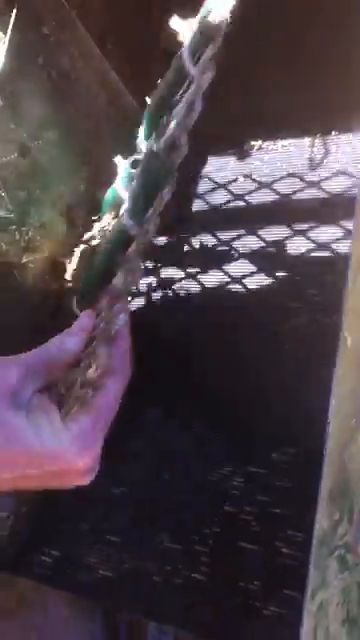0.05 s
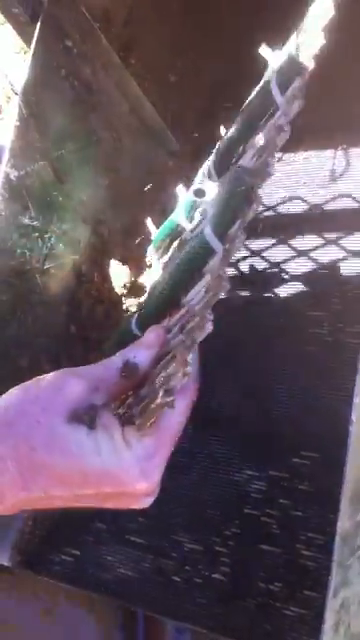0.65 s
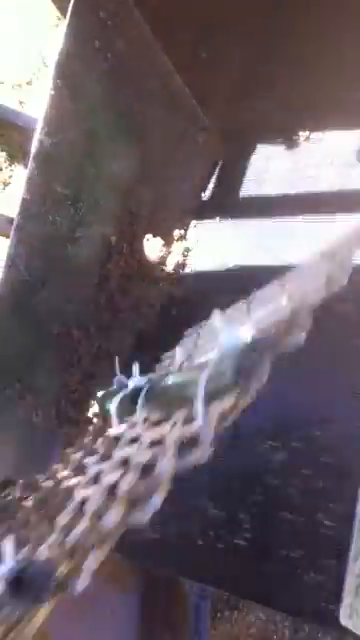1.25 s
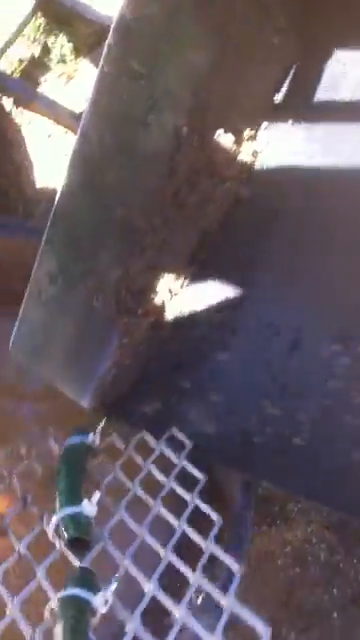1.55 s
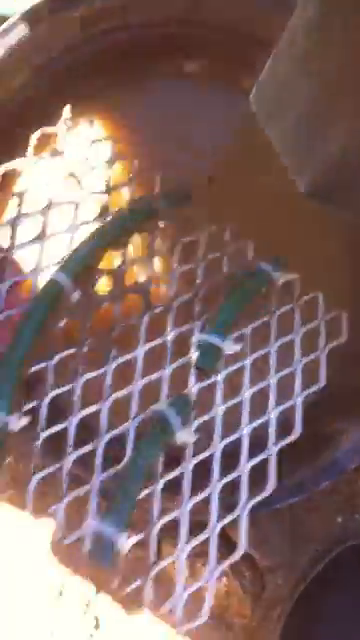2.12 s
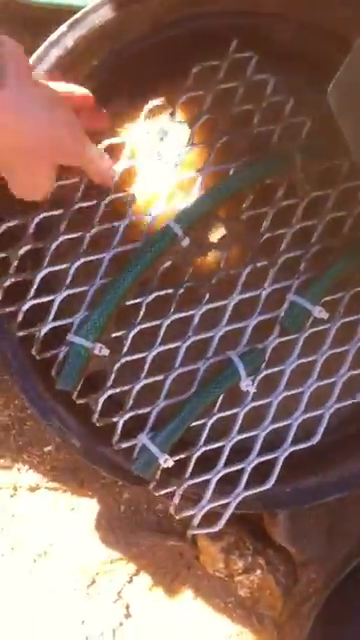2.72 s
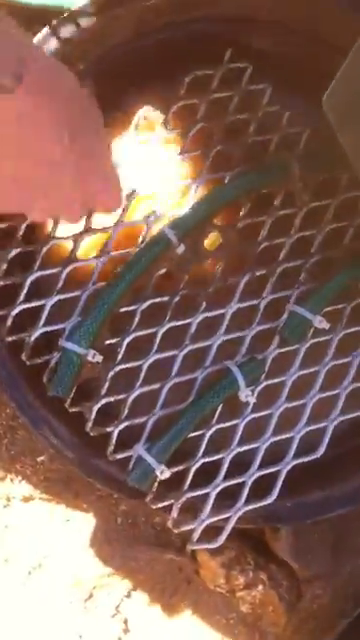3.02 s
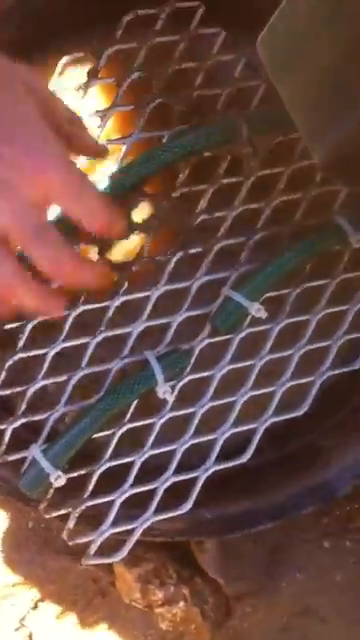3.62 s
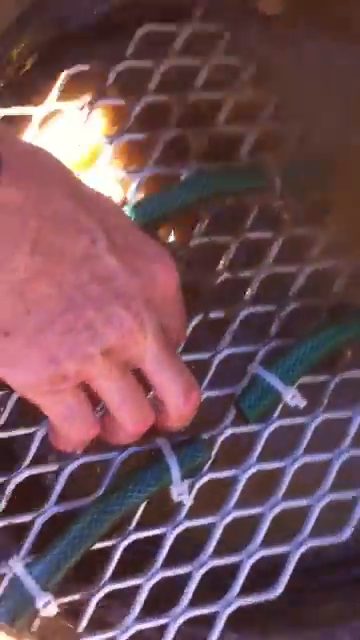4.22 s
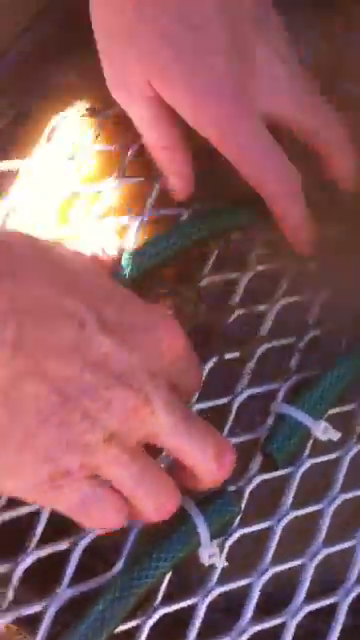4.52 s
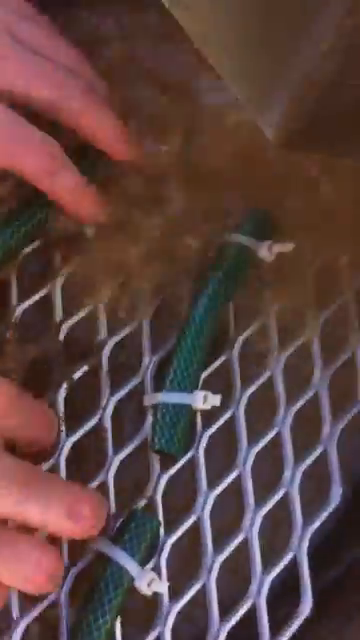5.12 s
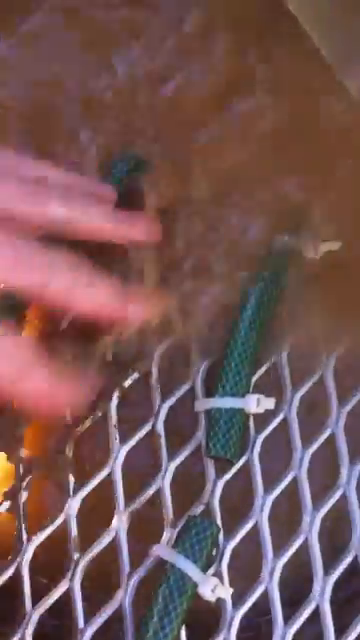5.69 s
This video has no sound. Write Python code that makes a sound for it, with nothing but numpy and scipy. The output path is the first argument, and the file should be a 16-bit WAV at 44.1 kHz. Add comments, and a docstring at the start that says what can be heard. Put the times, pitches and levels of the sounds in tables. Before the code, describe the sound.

Close by in a quiet outdoor spot, two solid knocks of steel mesh on a board shake loose a patter of grit and drips. A much softer knock follows. The mesh then lands in a plastic tub of water, its wires rattling and the tub ringing dully. It scrapes and clicks in short pushes while faint bubbles rise, then gives a last hard clatter and a sharp wire snap.

```python
"""In quiet outdoor air, a wet steel mesh with hose runners is knocked twice against a board.
The board thuds and rings; shed grit and drips tick on the ground, and a faint third knock follows.
The mesh clips the rim of a plastic tub of water, drops in and clatters, ringing wires and tub.
Short scraping strokes push it under, wires ping, and trapped air rises as small bubbles.
One last hard clatter comes near the end."""
import sys
import numpy as np
from scipy import signal
from scipy.fft import rfft, irfft, next_fast_len
from scipy.io import wavfile

SR = 44100
rng = np.random.default_rng(int(sys.argv[2]) if len(sys.argv) > 2 else 0)


def transcribe(u):
    """Save the signal u as a 16-bit wav file named by the first command-line argument.

    u: samples, shape (n,) or (channels, n), limited to [-1, 1]; the rate is SR.
    q: integer samples, one column per channel.
    """
    v = np.clip(np.atleast_2d(u).T, -1, 1)
    q = np.round(v * 32767).astype(np.int16)
    wavfile.write(sys.argv[1], SR, q)


N = 262394
RING_SIZE = 24576
RING_T = np.arange(RING_SIZE) / SR

# Colours of the outdoor air and a far hum. Each row: frequency in Hz, relative level in dB.
AIR_COLOUR = [(15, -63), (25, -32), (117, -8.5), (180, -7.5), (317, -11), (363, -13), (427, -8.5),
              (545, -14.5), (863, -12.5), (962, -14), (1790, -20.5), (5570, -30.5), (6740, -28),
              (7920, -30.5), (16000, -23.5)]
HUM_COLOUR = [(100, -35.5), (114, -8.5), (118, 16), (135, -29.5)]
# The air's fader. Each row: time in seconds, level in dB.
AIR_LEVEL = [(0, -59), (0.2, -62), (2.299, -64), (5.95, -59.5)]

# Wire snaps and grit. Each row: start in seconds, relative level in dB, brightness in dB per octave.
TICKS = [(0.387, -35, 4), (0.4206, -33.5, 6.5), (0.458, -47, 6), (0.597, -45, 4), (0.675, -32, -1),
         (0.7193, -40.5, 5), (1.1558, -47.5, 5.5), (1.1743, -44, -0.5), (1.8577, -34, 1.5),
         (1.9125, -43.5, 16), (2.1274, -44.5, 15), (2.5136, -22.5, -5), (2.771, -28, -1.5),
         (2.843, -33, -1.5), (2.926, -35, 9), (3.092, -33, -3), (3.264, -33, 1), (3.6885, -34, -4.5),
         (4.224, -20.5, 1.5), (5.3846, -20, -7.5), (5.5465, -28, -1), (5.696, -30.5, 6), (5.8087, -26.5, 8)]
# Colour of a gritty tick. Each row: frequency in Hz, relative level in dB.
TICK_COLOUR = [(300, -5.5), (900, -4.5), (2000, -1.5), (4000, -2), (8000, -2), (11000, -3.5),
               (16000, -12.5)]
# Single wire pings. Each row: start in seconds, level in dB, pitch in Hz, t60 in seconds.
PINGS = [(2.001, -40.5, 3030, 0.01), (2.093, -38, 4720, 0.0053), (2.848, -36.5, 3270, 0.029),
         (4.643, -33, 2770, 0.023), (5.651, -47.5, 1150, .04), (5.7, -39, 2970, 0.054),
         (5.812, -8.5, 3560, 0.0036), (5.891, -32.5, 2070, 0.02)]
# The wire that clips the rim. Each row: frequency in Hz, relative level in dB, t60 in seconds.
RIM_WIRE_MODES = [(2300, -2, 0.26), (2350, 3.5, 0.11), (2430, 0, 0.072), (3030, -4, 0.062),
                  (3360, 4.5, 0.031)]

# Knocks on the board. Each row: start in seconds, then relative dB of ring, thud, grit and wire crack.
KNOCKS = [(0.187, 4.5, -8.5, -17, -17), (0.633, 1, -13.5, -21, -11), (1.71, 0.5, -39, -62, -55)]
# Board modes; each knock lands on another spot.
# Each row: frequency in Hz, t60 in seconds, then relative dB in the first, second and third knock.
BOARD_MODES = [(215, .62, -29, -37, -60), (460, .55, -35, -34, -64), (815, .16, -24, -31, -62),
               (178, .25, -35, -33, -48), (208, .08, -17, -24, -46), (254, .2, -34, -28, -54),
               (276, .18, -29, -42, -38), (334, .2, -33, -34, -52), (386, .09, -14, -16, -42),
               (432, .055, -9, -16, -56), (457, .12, -24, -12, -54), (486, .08, -14, -30, -42),
               (632, .08, -27, -23, -58), (705, .07, -32, -38, -48), (830, .05, -21, -28, -60),
               (920, .05, -18, -28, -62), (1040, .05, -21, -19, -70), (1272, .1, -29, -42, -80),
               (1420, .06, -28, -30, -80), (1660, .05, -27, -23, -80), (1875, .05, -24, -23, -80)]
# Dull bumps of the hose runners and the shaken board. Each row: start in seconds, relative level in dB.
BUMPS = [(0.244, -27), (0.718, -38), (0.867, -50.5), (1.715, -41.5), (1.773, -57), (1.969, -48.5),
         (4.02, -46), (4.385, -41.5), (5.251, -46), (5.832, -47)]
# Colours of a bump and of a knock's thud. Each row: frequency in Hz, relative level in dB.
BUMP_COLOUR = [(140, -15), (190, 5.5), (290, 2.5), (370, 5.5), (480, -3), (700, -12.5), (1000, -14)]
THUD_COLOUR = [(80, -23.5), (130, -7.5), (200, 1), (310, -9.5), (400, -3.5), (480, -2.5), (650, -3.5),
               (1000, -10.5), (1900, -15.5), (3300, -26.5), (4700, -26), (8000, -20.5), (16000, -32.5)]
# The thud's decay. Each row: frequency in Hz, t60 in seconds.
THUD_DECAY = [(200, 0.55), (500, 0.11), (1000, 0.14), (2500, 0.072), (9000, 0.046)]

# Modes of the mesh and of the tub's floor and wall.
# Each row: frequency in Hz, relative level in dB, t60 in seconds before the water caps it.
MESH_MODES = [(1340, -12, .15), (1460, -9, .18), (1789, -4, .18), (1846, -4, .15), (1935, -3, .15),
              (2060, -1, .15), (2120, 0, .17), (2349, -1, .2), (2436, -2, .2), (2675, -2, .2),
              (2965, -4, .18), (3030, -3, .18), (3233, -2, .16), (3533, -3, .22), (3754, -6, .2)]
FLOOR_MODES = [(189.3, -2.5, 0.18), (212.6, 6.5, 0.06), (274, -7.5, 0.28), (288, -22.5, 0.047),
               (365, -25, 0.23)]
WALL_MODES = [(361, -4, 0.038), (476.5, -4.5, .12), (535.9, -3, 0.18), (585.9, -1, 0.25),
              (629.6, -7.5, 0.25), (649.5, -3.5, 0.26), (732, -3, 0.094), (806.5, -3.5, 0.069),
              (909, -2, 0.071), (1031, -8, 0.071), (1130, -11, 0.1), (1390, -14, 0.09)]
# Colours of mesh, thin wires and wire scratching plastic. Each row: frequency in Hz, relative dB.
MESH_COLOUR = [(800, -62), (1100, -34), (1350, -5.5), (1650, -7.5), (2060, 4), (2450, -3), (2800, -2.5),
               (3500, -16.5)]
THIN_WIRE_COLOUR = [(1900, -4.5), (2500, -10), (2900, -2.5), (3300, 1.5), (3900, -5), (4700, -8),
                    (6500, -24.5)]
SCRATCH_COLOUR = [(2500, -68), (4000, -6), (5500, -2.5), (7500, -5), (10000, -8), (12000, -13),
                  (15500, -13.5)]
# How strongly the five parts answer: mesh, floor, wall, scratch, thin wire.
# Each row: gain for a blow in dB, gain for a slide in dB.
COUPLING = [(19.2, -1), (20.4, -7), (19.9, -0.5), (18.3, 0.5), (19.24, 1)]
# The mesh creeps under its own weight. Each row: time in seconds, relative level in dB.
CREEP = [(2.56, -48.5), (2.73, -55.5), (2.96, -53), (3.07, -55.5), (3.13, -69.5), (3.26, -69), (3.34, -55),
         (3.5, -68), (3.7, -59.5), (3.83, -62), (5.63, -68.5), (5.95, -75)]
# Hands push the mesh under. Each row: start and length in seconds, relative final level in dB,
# swell on the way in dB, then tub and scratch offsets in dB.
STROKES = [(3.663, 0.045, -52, -7, -11, 1), (3.851, 0.14, -45, 2.5, 6, 6.5),
           (4.014, 0.058, -36.5, -6.5, -2, -9), (4.087, 0.049, -40, 0, -4.5, -5.5),
           (4.129, 0.065, -31, 5.5, -11, -8.5), (4.262, 0.043, -42, -3, 0.5, -22),
           (4.305, 0.09, -29, 9, -4.5, -14), (4.471, 0.047, -39, -2.5, -1, -5),
           (4.595, .025, -58.5, 1, 1, 4), (4.685, 0.09, -42.5, -4, -4, -3.5),
           (4.828, 0.042, -41, -2.5, -9, -12), (4.886, 0.085, -35.5, 21, -6, -10),
           (5.036, 0.082, -30, 5.5, -0.5, -9), (5.15, 0.044, -38.5, -0.5, 3, -6.5),
           (5.215, 0.044, -57.5, 5, 13, -6), (5.445, 0.077, -54, -10.5, 3.5, -4),
           (5.723, 0.064, -37.5, -1, 0, -7), (5.837, 0.053, -56, 4, 8.5, 8.5)]
# The mesh hits the tub. Each row: start in seconds, strength in dB,
# then tub, scratch and thin wire offsets in dB, and the clatter's t60 in seconds.
HITS = [(2.3483, -14, 3.5, -8, -1.5, 0.11), (2.3623, -23.5, 8.5, -14, 5, .12),
        (2.3875, -22.5, 4, -25, -15, 0.2), (2.4582, -15.5, -7, 0, -5.5, 0.05),
        (2.5251, -21, 10, -11, -11, 0.1), (2.544, -20.5, 0, -4.5, -2, 0.14),
        (2.648, -29, 0.5, -13.5, -9, 0.046), (2.7868, -24.5, -7.5, -6.5, -8, 0.081),
        (2.882, -29.5, -4.5, -16, -7.5, .035), (2.9433, -24.5, -9.5, -10, -6.5, 0.039),
        (2.99, -22.5, -12.5, -24, -4, 0.17), (3.2787, -29.5, 3.5, 0, -6, .093),
        (3.304, -30.5, -3.5, -28, -13, 0.13), (3.408, -37.5, -3, -29, -32, .022),
        (3.56, -37, -6.5, -30, -8.5, 0.047), (3.8332, -30, -5, -27, -7.5, 0.068),
        (3.8593, -39, 6.5, 14.5, -2, 0.15), (3.89, -24.5, -6.5, -15, -5, 0.0089),
        (3.9293, -42, 0, 13, 2, 0.067), (3.961, -21.5, -6, -4, 1, 0.065),
        (4.261, -20, -6.5, -11, -3, 0.037), (4.384, -22.5, -9, -7, 0, 0.11),
        (4.464, -22, -8.5, -18, -13, 0.047), (5.0566, -19, -10, -30, -11, 0.035),
        (5.2864, -31, -21, -26, -2.5, 0.046), (5.394, -9, -9.5, -5.5, -6, 0.12)]


def from_db(db):
    """Decibels to gain."""
    return 10 ** (np.asarray(db) / 20)


def unit(x):
    """Scale to an energy of one."""
    return x / np.sqrt(np.sum(x ** 2) + 1e-20)


def fade(t60):
    """Exponential decay, 60 dB down after t60 seconds."""
    return np.exp(-np.log(1000) * RING_T / max(t60, 1e-3))


def add(out, start_s, sound):
    """Mix a sound in at a time."""
    start = int(round(start_s * SR))
    out[start:start + len(sound)] += sound[:N - start]


def low_cut(x, hz):
    """Roll off the lows: small bodies radiate little bass."""
    return signal.sosfilt(signal.butter(4, hz, "high", fs=SR, output="sos"), x)


def log_bins(size):
    """Log frequency of each bin of a spectrum."""
    return np.log(np.fft.rfftfreq(size, 1 / SR) + 1)


def coloured(x, colour):
    """EQ a sound with a curve that falls away beyond its ends."""
    hz, db = np.transpose(colour)
    size = next_fast_len(len(x), True)
    corners = np.log([hz[0] / 2, *hz, hz[-1] * 2])
    eq_db = np.interp(log_bins(size), corners, [db[0] - 10.5, *db, db[-1] - 23])
    return irfft(rfft(x, size) * from_db(eq_db), size)[:len(x)]


def noise(colour, size):
    """Noise of a given colour; rms 1."""
    return unit(coloured(rng.standard_normal(size), colour)) * np.sqrt(size)


def grains(per_s, spread_db, size):
    """Random tiny contacts of uneven strength; rms 1."""
    strength = from_db(spread_db * np.minimum(rng.exponential(1, size), 4))
    polarity = rng.choice([-1, 1], size)
    touches = rng.random(size) < per_s / SR
    return unit(strength * polarity * touches) * np.sqrt(size)


def mode(hz, t60):
    """One decaying sine."""
    return np.sin(2 * np.pi * hz * RING_T) * fade(t60)


def ringing(colour, t60, tail_db, tail_t60):
    """Many crowded modes: a quick decay, then a weaker slow one."""
    return unit(noise(colour, RING_SIZE) * (fade(t60) + from_db(tail_db) * fade(tail_t60)))


def wet_body(modes, longest_t60=0.24):
    """A set of modes, neighbours swinging in opposite senses; water keeps every ring short."""
    return unit(sum((-1) ** k * from_db(db) * mode(hz, min(t60, longest_t60))
                    for k, (hz, db, t60) in enumerate(modes)))


def through(drive, response):
    """Let a body ring to a drive."""
    return signal.fftconvolve(drive, response)[:len(drive)]


def outdoor_air(hum_db=-71.5):
    """The bed: soft air and a faint far hum."""
    air_db = np.interp(np.arange(N) / SR, *np.transpose(AIR_LEVEL))
    return from_db(air_db) * noise(AIR_COLOUR, N) + from_db(hum_db) * noise(HUM_COLOUR, N)


def bubbles(push, count=90, ring_cycles=45, rise=6.0):
    """The sinking mesh traps air: bubbles ring and rise in pitch, louder when it is pushed harder."""
    first_s, out = STROKES[0][0], np.zeros(N)
    for when, pitch, size in rng.random((count, 3)):
        start = first_s + when * ((N - 1) / SR - first_s)
        hz = 750 * 9 ** pitch
        blip = np.sin(2 * np.pi * hz * RING_T * (1 + rise * RING_T)) * fade(ring_cycles / hz)
        add(out, start, push[int(start * SR)] * from_db(8 * size - 1) * blip)
    return out


def spatter(t60, tilt_db):
    """A gritty snap with a faint tail, tilted by tilt_db per octave."""
    colour = [(hz, db + tilt_db * np.log2(hz)) for hz, db in TICK_COLOUR]
    grit = coloured(grains(per_s=8300, spread_db=2.5, size=RING_SIZE), colour)
    attack = 1 - fade(t60 / 4)
    decay = fade(t60) + from_db(-27.5) * fade(0.17)
    return from_db(15) * unit(grit * attack * decay)


def snaps_and_drips(drips_per_knock=6, tick_t60=0.026):
    """Each knock brings a wire crack, a spray and drips; stray snaps and grit tick in between."""
    out = np.zeros(N)
    for start, *_, grit_db, crack_db in KNOCKS:
        # the wire cracks just before the board swings, then springs back and flings a bright spray
        add(out, start - 0.0023, from_db(crack_db) * spatter(t60=0.038, tilt_db=-1))
        add(out, start + 0.029, from_db(grit_db - 7.5) * spatter(t60=0.04, tilt_db=7.5))
        for wait_s in 0.089 + 0.28 * rng.random(drips_per_knock):
            add(out, start + wait_s, from_db(-47 - 9 * wait_s) * spatter(tick_t60, tilt_db=5.5))
    for start, db, tilt_db in TICKS:
        add(out, start, from_db(db) * spatter(tick_t60, tilt_db))
    return low_cut(out, hz=250)


def wire_pings(rim_tap_s=1.8583, rim_tap_db=-40.5, echo_db=-6):
    """One wire clips the tub's rim and others ping, echoing between tub and board."""
    pings = np.zeros(N)
    rim_tap = [(rim_tap_s, rim_tap_db + db, hz, t60) for hz, db, t60 in RIM_WIRE_MODES]
    for start, db, hz, t60 in [*rim_tap, *PINGS]:
        # a wire buzzes against its neighbours, which roughens the ring
        buzz = 1 + 0.6 * noise([(30, 0), (200, -3), (500, -20)], RING_SIZE)
        add(pings, start, from_db(db) * mode(hz, t60) * buzz)
    echo = through(pings, unit(rng.standard_normal(RING_SIZE) * fade(0.036)))
    return low_cut(pings + from_db(echo_db) * echo, hz=250)


def thud():
    """The board's crowded modes and the yard's answer; the lows hang on longest."""
    band_hz, band_t60 = np.transpose(THUD_DECAY)
    bands = [np.interp(log_bins(RING_SIZE), np.log(band_hz), row) for row in np.eye(len(band_hz))]
    spectrum = rfft(noise(THUD_COLOUR, RING_SIZE))
    return unit(sum(irfft(spectrum * band) * fade(t60) for band, t60 in zip(bands, band_t60)))


def shed_grit(peak_s=0.031, log_width=0.5):
    """Shaken-off grit patters down in a quick shower with a thin tail."""
    shower = np.exp(-0.5 * (np.log((RING_T + 1 / SR) / peak_s) / log_width) ** 2)
    patter = coloured(grains(per_s=1600, spread_db=1.3, size=RING_SIZE), TICK_COLOUR)
    return unit(patter * (shower + from_db(-11) * fade(0.37)))


def board_knocks():
    """Each knock rings the board and shakes grit loose; the hose runners and the board bump dully."""
    out = np.zeros(N)
    for k, (start, ring_db, thud_db, grit_db, _) in enumerate(KNOCKS):
        ring = sum(from_db(spot_db[k]) * mode(hz, t60) for hz, t60, *spot_db in BOARD_MODES)
        add(out, start, from_db(ring_db) * low_cut(ring, hz=190))
        add(out, start, from_db(thud_db + 20) * thud())
        add(out, start, from_db(grit_db + 8) * shed_grit())
    for start, db in BUMPS:
        add(out, start, from_db(db + 29) * ringing(BUMP_COLOUR, t60=0.23, tail_db=-11, tail_t60=0.46))
    return low_cut(out, hz=162.7)


def sloshed_wall(detune=0.0086):
    """Sloshing water shifts the tub wall's modes from contact to contact."""
    shifts = 1 + detune * rng.standard_normal(len(WALL_MODES))
    return wet_body([(hz * shift, db, t60) for (hz, db, t60), shift in zip(WALL_MODES, shifts)])


def contact_responses(mesh_ring, thin_ring, floor_ring):
    """The five parts struck at one point: the main modes stay, the crowded ones change each time."""
    mesh = ringing(MESH_COLOUR, t60=0.0073, tail_db=-3.5, tail_t60=0.2) + from_db(-12) * mesh_ring
    thin = ringing(THIN_WIRE_COLOUR, t60=0.006, tail_db=-19.5, tail_t60=0.11) + from_db(-14) * thin_ring
    scratch = ringing(SCRATCH_COLOUR, t60=0.0066, tail_db=-10, tail_t60=0.02)
    return unit(mesh), floor_ring, sloshed_wall(), scratch, unit(thin)


def stroke_gain(start, length, final_db, swell_db, grip_s=0.02, release_db_per_s=331):
    """One push grips, swells or eases while the hand moves, and dies away when it stops."""
    t = np.arange(N) / SR - start
    moving_db = final_db + swell_db * (np.clip(t / length, 0, 1) - 1)
    release_db = release_db_per_s * np.maximum(t - length, 0)
    return np.clip(t / grip_s, 0, 1) * from_db(moving_db - release_db)


def rubbing_gains(creep_tub_db=5.5, creep_scratch_db=-3.5):
    """How hard creep and strokes rub mesh, floor, wall, scratch and thin wire, summed in power."""
    creep = from_db(np.interp(np.arange(N) / SR, *np.transpose(CREEP), left=-np.inf))
    moves = [(creep, creep_tub_db, creep_scratch_db)]
    moves += [(stroke_gain(*shape), tub_db, scratch_db) for *shape, tub_db, scratch_db in STROKES]
    gains = np.array([gain for gain, _, _ in moves])
    shares = from_db([(0, tub_db - 10.5, tub_db, scratch_db, 0.5 + 0.14 * scratch_db)
                      for _, tub_db, scratch_db in moves])
    return np.sqrt(shares.T ** 2 @ gains ** 2)


def scraping(rubbing, rings, slips_per_s=120, stutter_db=3.5):
    """Wires catch and slip on the plastic, so a stuttering friction drives mesh and tub."""
    out = np.zeros(N)
    slips = np.arange(0, N, SR // slips_per_s)
    stutter = from_db(stutter_db * np.interp(np.arange(N), slips, rng.standard_normal(len(slips))))
    friction = unit(grains(per_s=5000, spread_db=2.5, size=N) * stutter) * np.sqrt(N)
    stretch = SR // 8  # a new wire takes over the contact every eighth of a second
    for start in range(0, N, stretch):
        drives = friction[start:start + stretch] * rubbing[:, start:start + stretch]
        if drives.any():
            for drive, response, (_, slide_db) in zip(drives, contact_responses(*rings), COUPLING):
                add(out, start / SR, from_db(slide_db) * signal.fftconvolve(drive, response))
    return out


def clatter(rings, first_touch=0.36, firm_blow_db=-14):
    """The springy mesh lands each time with one firm touch and a quick run of lighter ones."""
    out = np.zeros(N)
    for start, mesh_db, tub_db, scratch_db, thin_db, t60 in HITS:
        touches = unit(grains(per_s=5000, spread_db=-1.5, size=RING_SIZE) * fade(t60))
        touches[0] += first_touch
        wall_db = mesh_db + tub_db
        floor_db = wall_db - 12.5 + 0.34 * (wall_db - firm_blow_db)  # harder blows reach deeper
        levels = mesh_db, floor_db, wall_db, mesh_db + scratch_db, mesh_db + thin_db
        for db, response, (blow_db, _) in zip(levels, contact_responses(*rings), COUPLING):
            add(out, start, from_db(db + blow_db) * unit(through(touches, response)))
    return out


def mesh_in_tub(rubbing):
    """Blows and scraping ring the same wires and the same water-damped tub."""
    wires = wet_body(MESH_MODES)
    mesh_ring = unit(coloured(wires, MESH_COLOUR))
    thin_ring = unit(coloured(wires, THIN_WIRE_COLOUR))
    rings = mesh_ring, thin_ring, wet_body(FLOOR_MODES)
    return low_cut(clatter(rings) + scraping(rubbing, rings), hz=128)


def scene():
    """Board, tub, bubbles, drips and pings over quiet outdoor air, in mono."""
    rubbing = rubbing_gains()
    mix = outdoor_air() + board_knocks() + mesh_in_tub(rubbing)
    mix += bubbles(push=rubbing[0]) + snaps_and_drips() + wire_pings()
    return mix[None]


def record(dry, ceiling=0.9, cutoff_hz=15900):
    """Round off the loudest peaks and cut the top steeply."""
    rounded = ceiling * np.tanh(dry / ceiling)
    return signal.sosfilt(signal.ellip(10, 0.2, 80, cutoff_hz, fs=SR, output="sos"), rounded)


dry = scene()
out = record(dry)
transcribe(out)
```